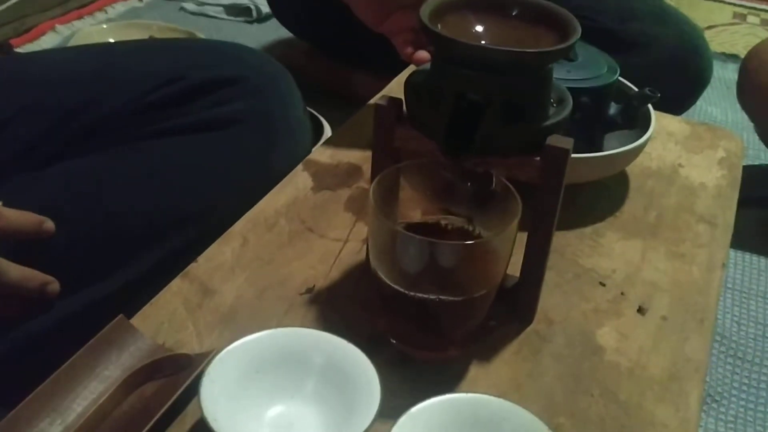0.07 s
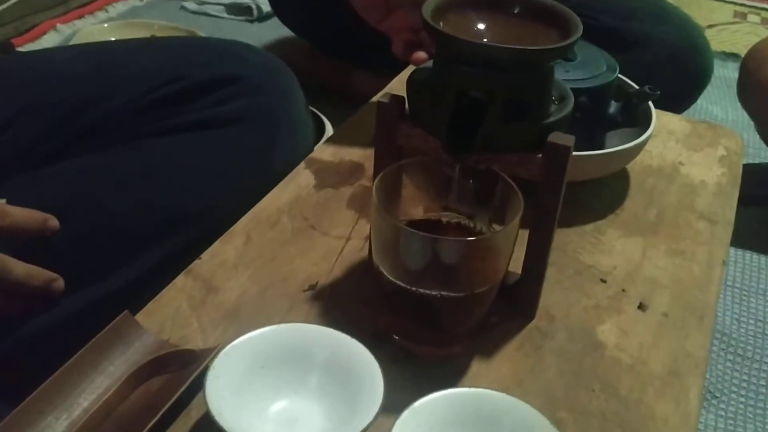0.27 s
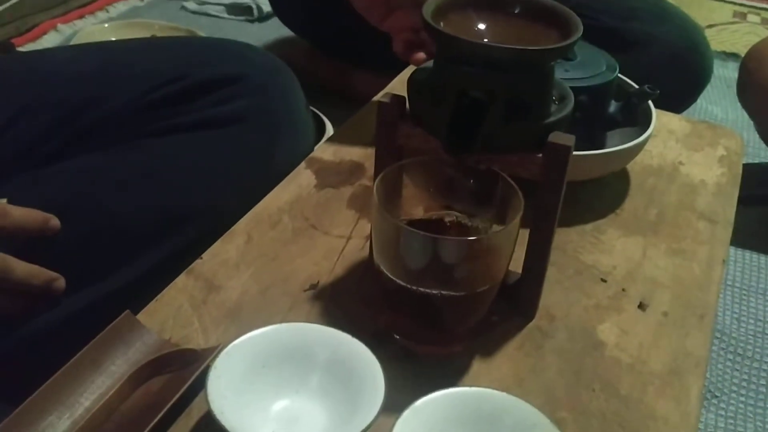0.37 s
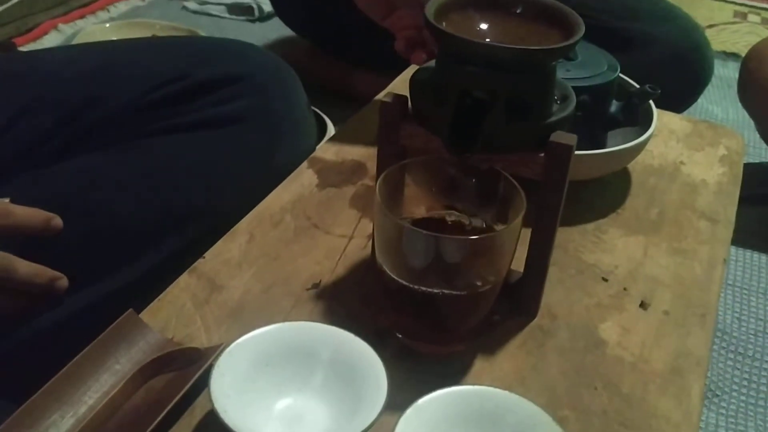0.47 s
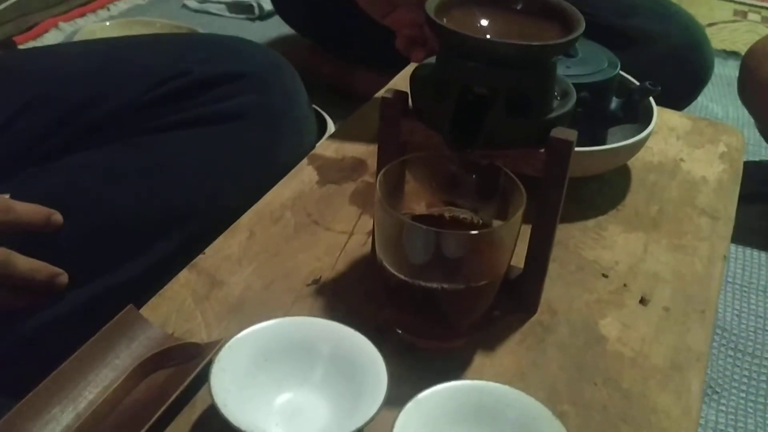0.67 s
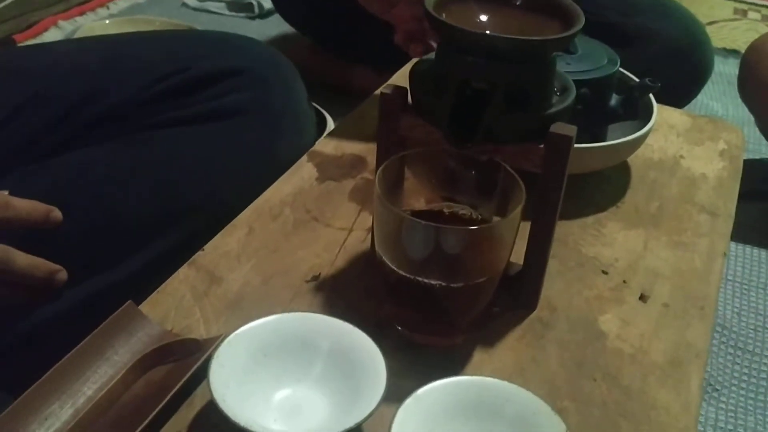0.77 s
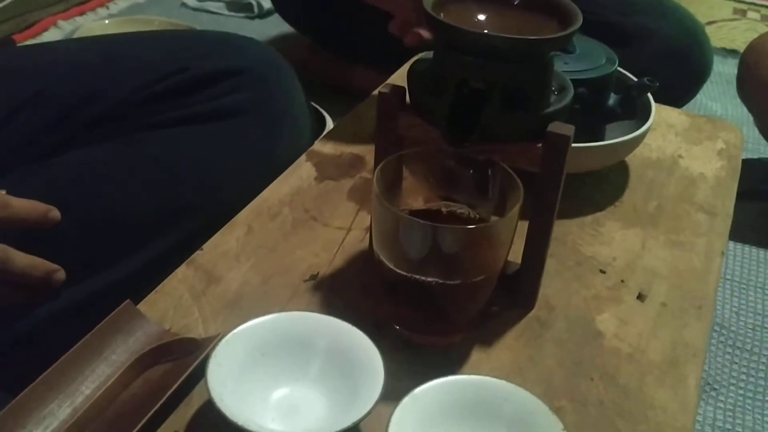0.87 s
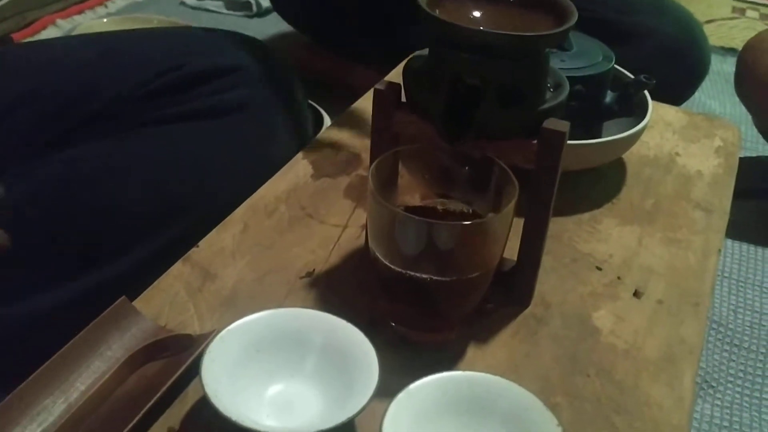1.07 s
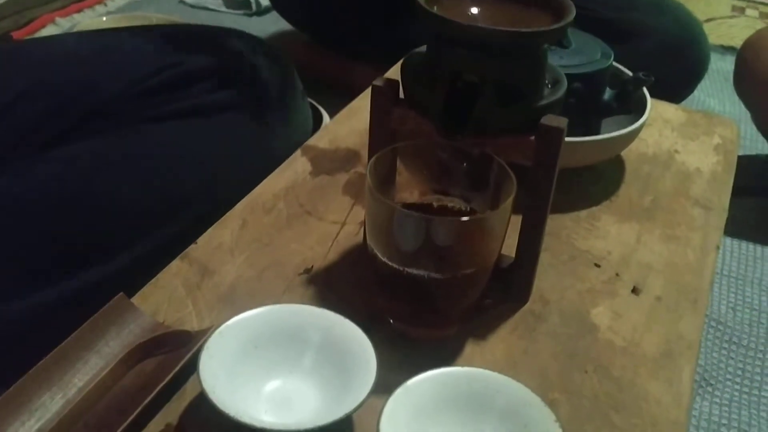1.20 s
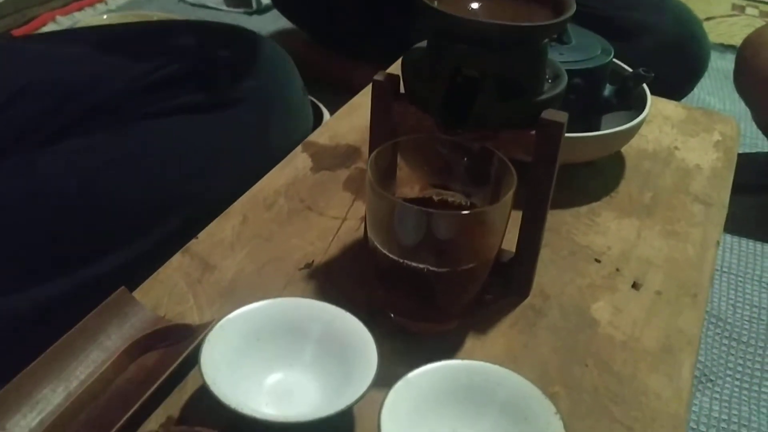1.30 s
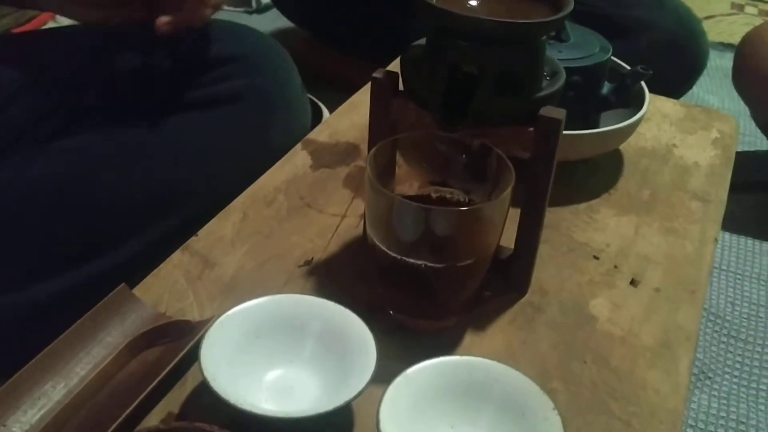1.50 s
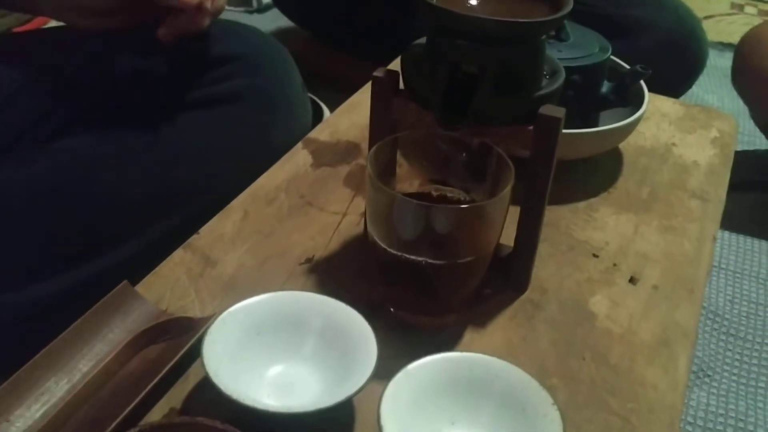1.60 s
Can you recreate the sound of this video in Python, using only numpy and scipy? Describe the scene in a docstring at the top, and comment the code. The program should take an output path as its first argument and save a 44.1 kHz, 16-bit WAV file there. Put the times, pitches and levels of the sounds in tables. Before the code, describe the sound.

Ceramic tea ware is set down on a wooden table close by, clinking briefly and settling with a few soft knocks. Faint ticks and cloth rustles follow. Outdoors, crickets trill steadily, mostly on the right, over a distant idling engine.

```python
"""A piece of ceramic ware is set down on a wooden tea table: one clink excites its modes, which ring
briefly, and it settles with a few soft knocks on the board. Around it, outdoors in the evening, crickets
trill without pause, mostly on the right, by drawing rows of teeth across their resonant wings.
Faint handling ticks and cloth rustles follow. An engine idles far away over a low rumble and hiss."""
import sys
import numpy as np
from scipy import signal
from scipy.fft import rfft, irfft
from scipy.io import wavfile
from scipy.ndimage import uniform_filter1d

SR = 44100
rng = np.random.default_rng(int(sys.argv[2]) if len(sys.argv) > 2 else 0)


def master(y):
    """Save y as 16-bit WAV."""
    cut = np.clip(np.atleast_2d(y).T, -1, 1)
    pcm = np.round(cut * 32767)  # scale
    wavfile.write(sys.argv[1], SR, pcm.astype(np.int16))


N = 72765

# touches of the ware, the first already dying away: start_s, strength_db, focus_hz, fall_db_per_octave
TOUCHES = [(-.1, -10.5, 886, 16), (.2455, 0.5, 1380, 0), (.376, -4, 2250, 28)]
# natural frequencies of the ware: pitch_hz
MODE_HZ = [640, 886, 1010, 1248, 1279, 1470, 1745, 1980, 2050, 2160, 2880, 3035, 6770, 7368, 10390, 10560,
           11990, 12850, 13230, 15700]
# the mode at each of those frequencies: contact_db, ring_db, t60_s, left_minus_right_db
MODES = [(-41, -55, .12, -4), (-64, -43, 0.7, 11), (-41, -35, 0.13, -1.5), (-32.5, -29.5, 0.15, 6.5),
         (-23, -45, .13, 8), (-18, -48, .13, 2.5), (-38, -57.5, 0.095, -1), (-23, -48.5, 0.3, 7),
         (-40, -39.5, .2, 11), (-41, -45.5, 0.45, 9), (-49.5, -60, 0.14, 15), (-33.5, -42, 0.13, -11),
         (-42.5, -42, 0.13, -30), (-49.5, -47.5, .22, -19), (-47.5, -47.5, .2, 28), (-39, -47, .15, 17),
         (-43.5, -52, .2, 16), (-54, -62, .15, 16), (-55, -50, .14, 16), (-45, -46, .09, 21)]
# spectrum of the contact crack: frequency_hz, density_db
CRACK_SPECTRUM = [(200, -28.5), (500, -4), (1400, -20), (3150, -1.5), (4000, -28), (5500, -19.5),
                  (7000, -19), (9400, -20.5), (10600, -18.5), (14000, -31), (15800, -24)]
# spectrum of the reflections from the surroundings: frequency_hz, density_db
ECHO_SPECTRUM = [(200, -48), (450, -12), (750, -10), (1350, 2.5), (2050, -1.5), (2450, -9.5), (3000, -12),
                 (3900, -24), (7000, -10.5), (9300, -21), (10800, -23.5), (14000, -32.5), (16000, -36)]
# soft knocks on the wooden board: start_s, level_db, pitch_hz, t60_s
KNOCKS = [(0.357, -45, 791, 0.15), (0.374, -41.5, 1053, 0.11), (.431, -48.5, 810, 0.091),
          (.436, -46, 828, 0.095), (0.63, -67.5, 684, 0.24), (1.512, -60, 860, 0.06),
          (1.547, -61.5, 1472, 0.071)]
# spectrum of the scuff in each knock: frequency_hz, density_db
SCUFF_SPECTRUM = [(200, -23), (430, -0.5), (1200, -2), (2600, -5), (4500, -24), (16000, -44)]
# wing resonances of the cricket groups: pitch_hz, width_hz, level_db, left_minus_right_db
CRICKET_GROUPS = [(6640, 520, -52.5, -13), (6962, 577, -49, -16), (6610, 570, -54.5, -6),
                  (10330, 1100, -71.5, 1)]
# handling ticks: start_s, level_db
TICKS = [(0.776, -61), (.877, -58), (1.196, -60)]
# brushes of cloth: start_s, level_db, t60_s
RUSTLES = [(.912, -62, 0.42), (1.585, -61, 0.98)]
# spectrum of cloth friction: frequency_hz, density_db
CLOTH_SPECTRUM = [(500, -9), (3000, -3), (6000, 4), (9000, 8.5), (12000, 1), (16000, -7)]
# harmonics of the engine's firing rate: harmonic_number, start_level_db, end_level_db
ENGINE_HARMONICS = [(4, -65, -54.5), (5, -63, -65), (6, -63, -63.5), (7, -78, -80), (12, -74.5, -85)]
# spectrum of the low rumble: frequency_hz, density_db
RUMBLE_SPECTRUM = [(12, -7), (30, 6), (55, -7), (100, -13.5), (170, -20.5), (300, -29), (1000, -59)]
# swell of the rumble: time_s, gain_db
RUMBLE_SWELL = [(0, 0), (.15, -1.5), (.5, 0.5), (0.848, -1.5), (1.05, 3), (1.3, 1), (1.62, -3.5)]
# spectrum of the air, in phase at the two ears: frequency_hz, density_db
AIR_MID_SPECTRUM = [(60, -1.5), (170, 3.5), (260, -4), (400, -6.5), (550, -13.5), (1500, -17.5),
                    (3500, -22), (9000, -34.5), (16000, -22)]
# spectrum of the air, in antiphase at the two ears: frequency_hz, density_db
AIR_SIDE_SPECTRUM = [(20, -12.5), (150, 6), (400, -10.5), (700, -10), (2000, -12.5), (4500, -18.5),
                     (9000, -23), (16000, -19.5)]


def clink(start, strength_db, focus_hz, fall_db):
    """Impact excites normal modes: loud during contact, then a quiet, damped free vibration."""
    attack_s, contact_s, release_s, echo_delay_s = 0.0016, 0.0064, 0.00036, 0.0078
    t = since(start)
    rise = np.minimum(t / attack_s, 1)
    contact = fade(t, t60=0.072) * np.exp(-since(start + contact_s) / release_s)
    modes = 0
    for k, (hz, (contact_db, ring_db, t60, pan_db)) in enumerate(zip(MODE_HZ, MODES)):
        flicker_db = 3.7 * np.array([wander(57.7), wander(57.7)])  # reflections vary the ring at each ear
        envelope = undb(contact_db - fall_db) * contact + undb(ring_db + flicker_db) * fade(t, t60)
        # neighbouring modes swing in opposite directions; those near the focus are driven hardest
        drive = (-1) ** k * undb(-fall_db * abs(np.log2(hz / focus_hz)))
        modes = modes + pan(pan_db) * drive * rise * envelope * np.sin(2 * np.pi * hz * t)
    crack = undb(-24) * pan(2.5) * ware_colour(noise(CRACK_SPECTRUM))
    crack *= np.sqrt(rise) * fade(t, t60=0.027)
    echo = undb(-29) * pan(0.5) * reflections()
    echo *= np.minimum(t / echo_delay_s, 1) * fade(since(start + echo_delay_s), t60=0.29)
    hardness = undb(-fall_db)  # soft touches lose the crack and its echo
    return undb(strength_db) * (modes + hardness * (crack + echo))


def ware_colour(x):
    """Resonance: the ware emphasises the parts of a noise near its natural frequencies."""
    return unit(x + undb(6) * sum(resonate(x, hz, width_hz=163) for hz in MODE_HZ))


def reflections(alike_below_hz=900):
    """A diffuse field is coherent at the two ears in the bass and uncorrelated in the treble."""
    mid, side = ware_colour(noise(ECHO_SPECTRUM, channels=2))
    side = signal.sosfilt(signal.butter(1, alike_below_hz, "high", fs=SR, output="sos"), side)
    return unit(np.array([mid + side, mid - side]))


def knock(start, hz, t60, table_hz=435, attack_s=0.0023):
    """Damped vibration: a soft, scuffing touch rings the board and the low mode of the whole table."""
    t = since(start)
    board_noise = unit(resonate(rng.standard_normal(N), hz, width_hz=230))
    board = np.sin(2 * np.pi * hz * t) + board_noise / np.sqrt(2)
    scuff = undb(-5) * noise(SCUFF_SPECTRUM)
    table = undb(-13.5) * np.sin(2 * np.pi * table_hz * t) * fade(t, t60=0.12)
    return ((board + scuff) * fade(t, t60) + table) * np.minimum(t / attack_s, 1)


def cricket(hz, width_hz, typical_strokes_per_s=85, teeth_per_s=2300, stroke_share=0.82):
    """Stridulation: each stroke drags a row of teeth whose impulses drive the wing's resonance."""
    strokes_per_s = typical_strokes_per_s * np.exp(0.25 * rng.standard_normal() + 0.0383 * wander(9))
    stroke_phase = (rng.random() + np.cumsum(strokes_per_s) / SR) % 1
    push = np.sin(np.pi * np.minimum(stroke_phase / stroke_share, 1))
    teeth = (rng.random((2, N)) < teeth_per_s / SR) * push  # scattered paths differ for each ear
    wing_hz = hz * (1 + 0.0072 * rng.standard_normal())
    return unit(resonate(teeth, wing_hz, width_hz))


def chorus(per_group=14):
    """Incoherent addition: insects trilling out of step merge into a continuous sound."""
    return sum(undb(db) * pan(pan_db) * unit(sum(cricket(hz, width_hz) for _ in range(per_group)))
               for hz, width_hz, db, pan_db in CRICKET_GROUPS)


def ticks():
    """Impulsive excitation: handling gives tiny, bright bursts that decay exponentially."""
    envelope = sum(undb(db) * (since(start) > 0) * fade(since(start), t60=0.05) for start, db in TICKS)
    return envelope * unit(resonate(rng.standard_normal((2, N)), hz=13300, width_hz=3000))


def rustle(attack_s=0.014):
    """Friction: short brushes of cloth radiate uneven broadband noise."""
    envelope = sum(undb(db) * np.minimum(since(start) / attack_s, 1) * fade(since(start), t60)
                   for start, db, t60 in RUSTLES)
    return envelope * undb(wander(36)) * noise(CLOTH_SPECTRUM, channels=2)


def engine(firing_hz=31.91, waver=0.004):
    """Periodic firing makes a harmonic series, of which only a few low members carry this far."""
    phase = 2 * np.pi * np.cumsum(firing_hz * (1 + waver * wander(5.3))) / SR
    return sum(np.sqrt(2) * undb(np.linspace(start_db, end_db, N)) * np.sin(harmonic * phase)
               for harmonic, start_db, end_db in ENGINE_HARMONICS)


def air():
    """Ambient noise: a swelling rumble lies under a faint hiss, widened by its antiphase part."""
    swell_db = np.interp(since(0), *np.array(RUMBLE_SWELL).T)
    rumble = undb(-55.5 + swell_db) * noise(RUMBLE_SPECTRUM)
    mid = undb(-60.5 - 1.15 * wander(3.4)) * noise(AIR_MID_SPECTRUM)
    side = undb(-63.5) * noise(AIR_SIDE_SPECTRUM)
    return rumble + mid + side * np.array([[1], [-1]])


def undb(db):
    """Amplitude ratio for a level in decibels."""
    return 10 ** (np.asarray(db) / 20)


def unit(x):
    """Normalisation to an rms of 1."""
    return x / np.sqrt(np.mean(x ** 2) + 1e-30)


def pan(db):
    """Left and right gains for an interaural level difference."""
    return unit(undb(np.array([[db], [-db]]) / 2))


def since(start):
    """Elapsed seconds after an onset, zero before it."""
    return np.maximum(np.arange(N) / SR - start, 0)


def fade(t, t60):
    """Exponential decay of 60 dB in t60 seconds."""
    return np.exp(-np.log(1000) * t / t60)


def wander(steps_per_s):
    """Slow random modulation: smoothed steps with an rms of 1."""
    hold = max(int(SR / steps_per_s), 1)
    steps = np.repeat(rng.standard_normal(N // hold + 1), hold)
    return unit(uniform_filter1d(uniform_filter1d(steps, hold), hold)[:N])


def noise(spectrum, channels=1):
    """Spectral shaping of independent white noise in each channel, to an rms of 1."""
    hz, db = np.array(spectrum).T
    bin_hz = np.maximum(np.fft.rfftfreq(N, 1 / SR), 1)
    gain = undb(np.interp(np.log(bin_hz), np.log(hz), db))
    return unit(irfft(rfft(rng.standard_normal((channels, N))) * gain, N))


def resonate(x, hz, width_hz):
    """Two equal resonators in cascade, each width_hz wide, give steep skirts."""
    b, a = signal.iirpeak(hz, hz / width_hz, fs=SR)
    return signal.lfilter(b, a, signal.lfilter(b, a, x))


def scene():
    """Superposition of the sounds at the table and the crickets, engine and air behind them."""
    clinks = sum(clink(*touch) for touch in TOUCHES)
    knocks = sum(undb(db) * knock(start, hz, t60) for start, db, hz, t60 in KNOCKS)
    return clinks + knocks + chorus() + ticks() + rustle() + engine() + air()


def record(dry, cutoff_hz=15850):
    """Band limiting: a steep low-pass filter removes the highest treble."""
    return signal.sosfilt(signal.ellip(10, 0.2, 70, cutoff_hz, fs=SR, output="sos"), dry)


dry = scene()
out = record(dry)
master(out)
```